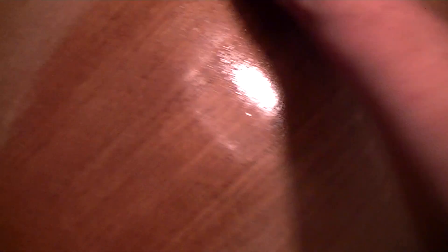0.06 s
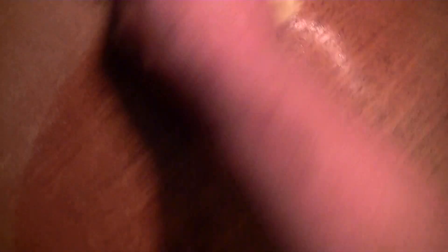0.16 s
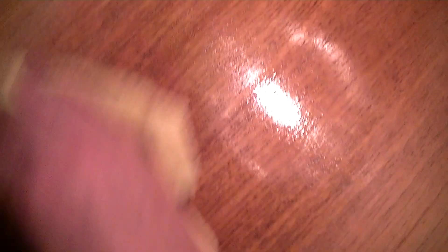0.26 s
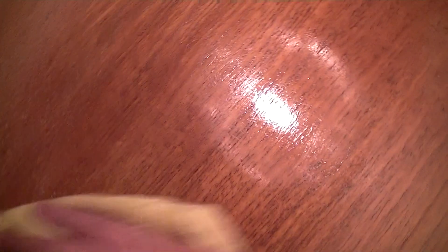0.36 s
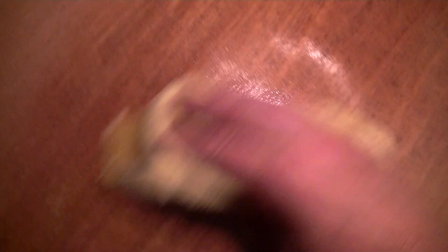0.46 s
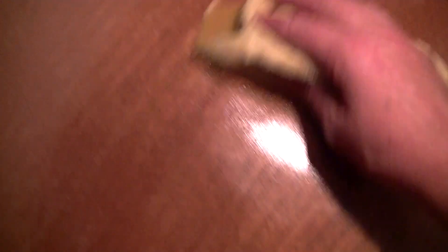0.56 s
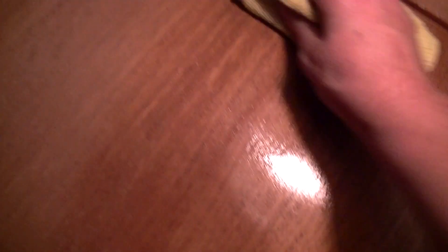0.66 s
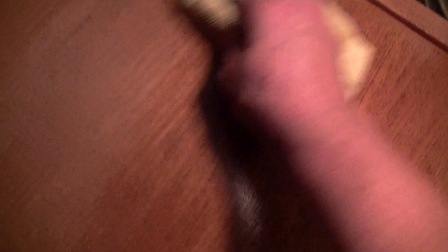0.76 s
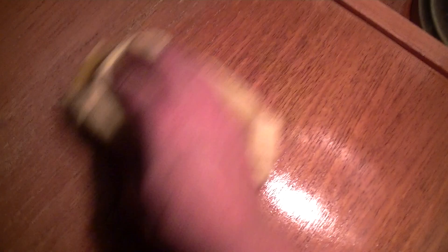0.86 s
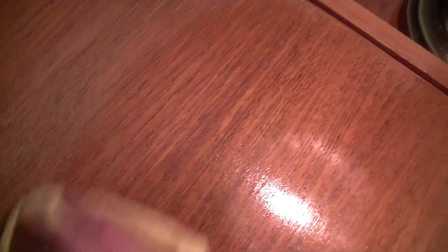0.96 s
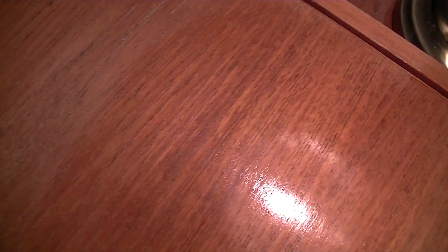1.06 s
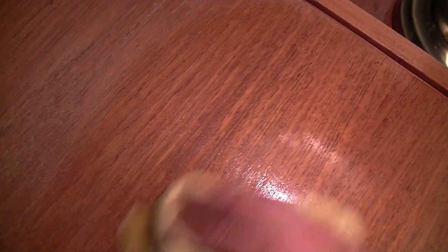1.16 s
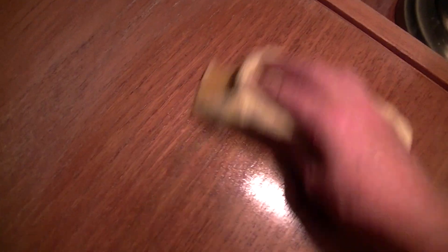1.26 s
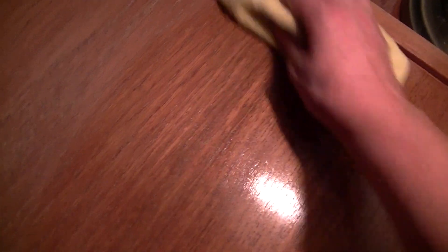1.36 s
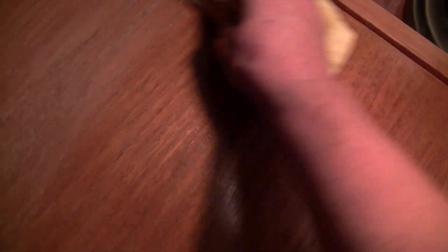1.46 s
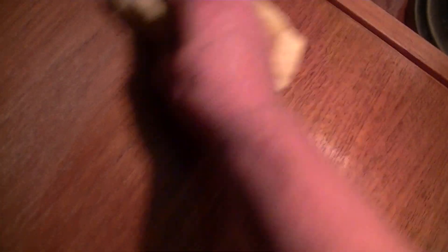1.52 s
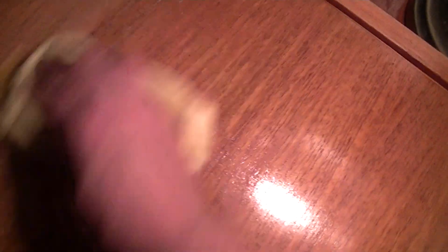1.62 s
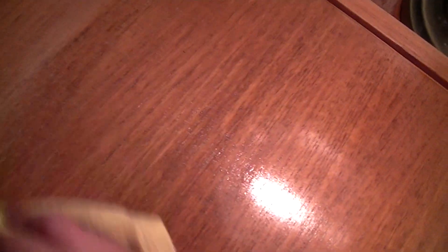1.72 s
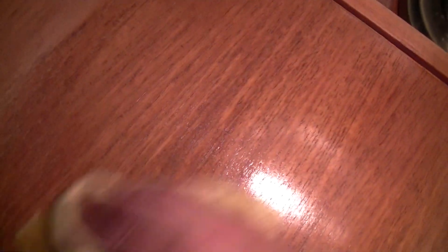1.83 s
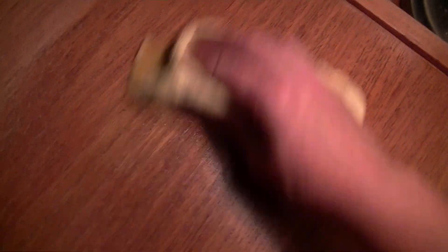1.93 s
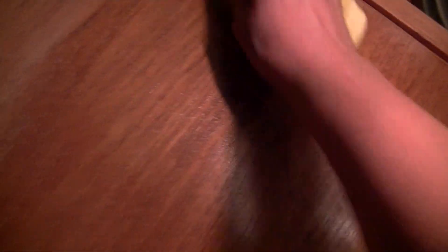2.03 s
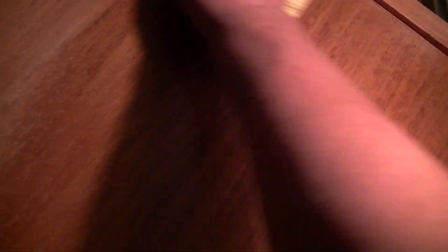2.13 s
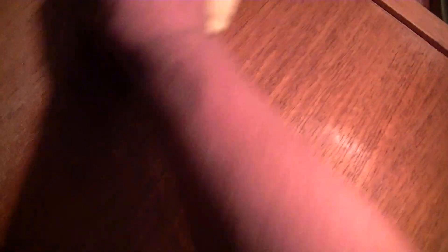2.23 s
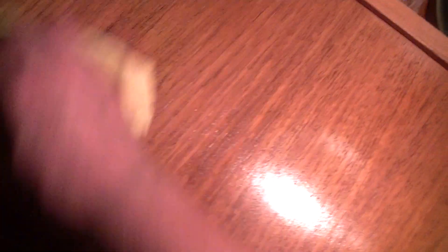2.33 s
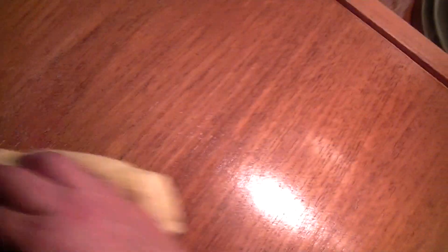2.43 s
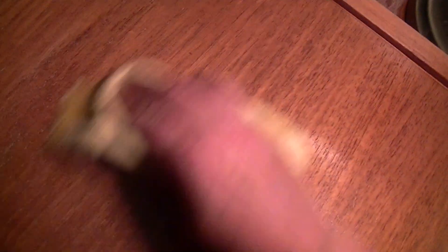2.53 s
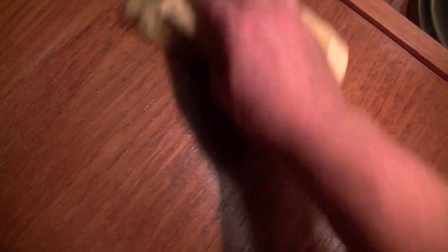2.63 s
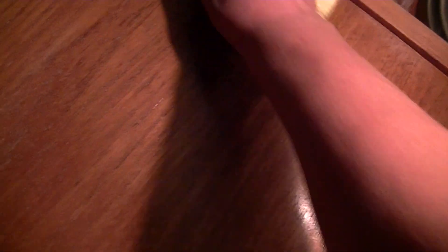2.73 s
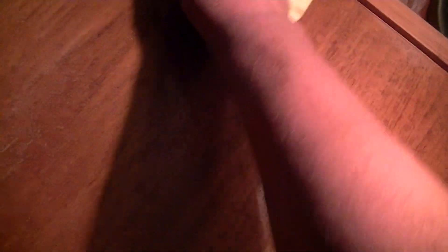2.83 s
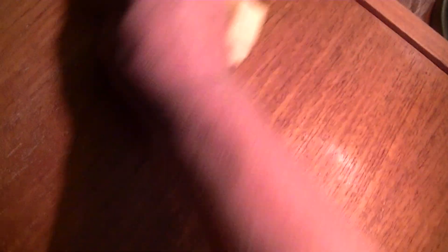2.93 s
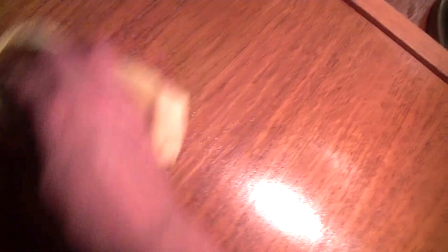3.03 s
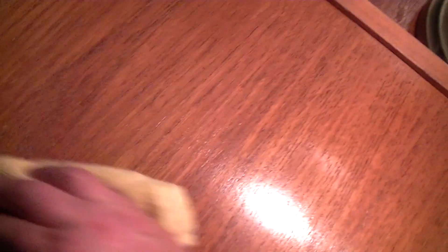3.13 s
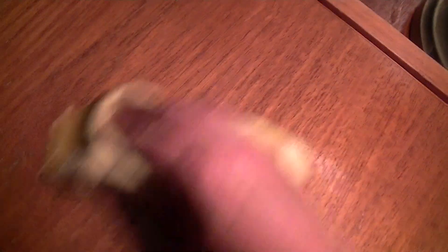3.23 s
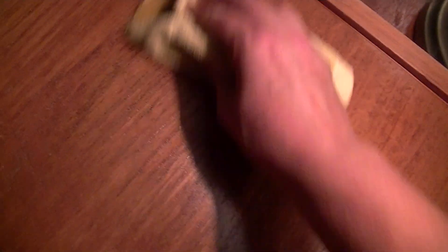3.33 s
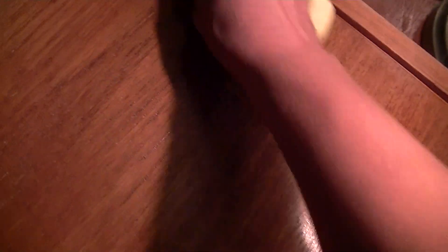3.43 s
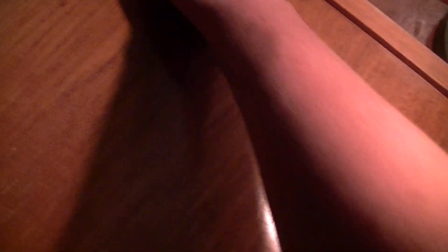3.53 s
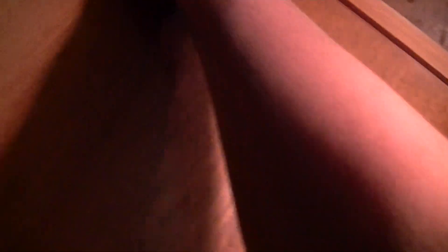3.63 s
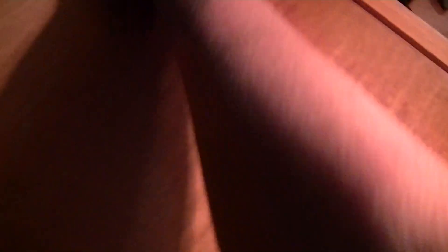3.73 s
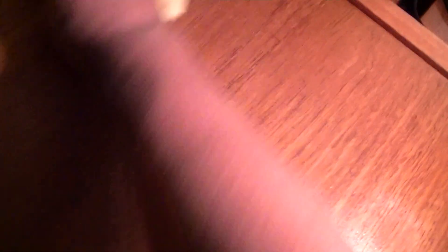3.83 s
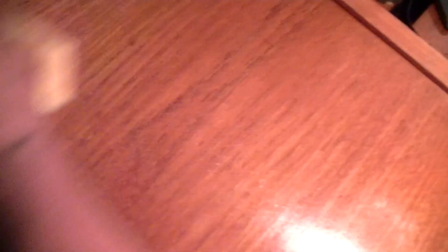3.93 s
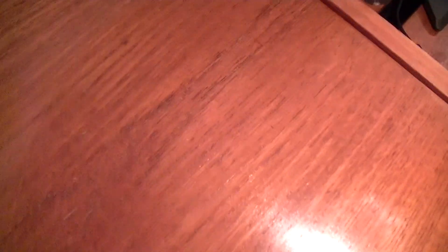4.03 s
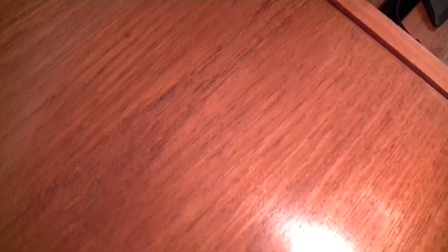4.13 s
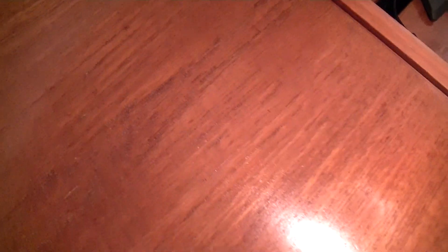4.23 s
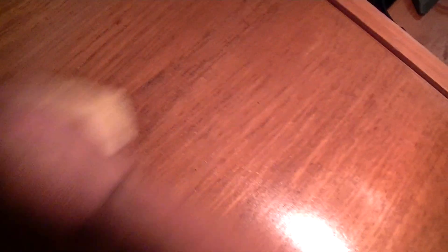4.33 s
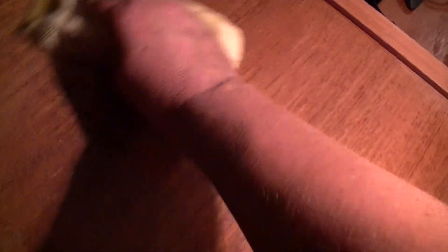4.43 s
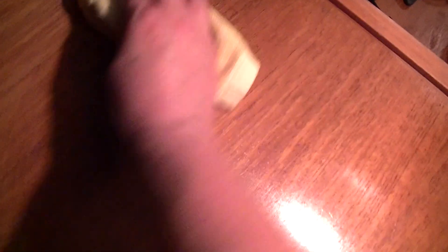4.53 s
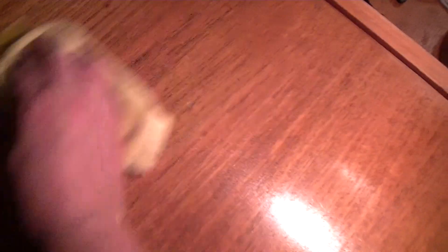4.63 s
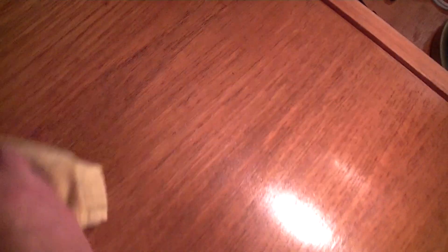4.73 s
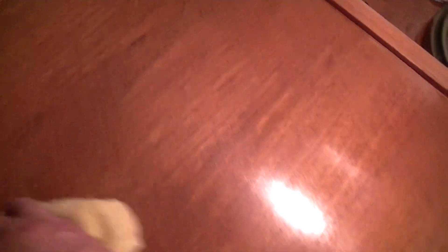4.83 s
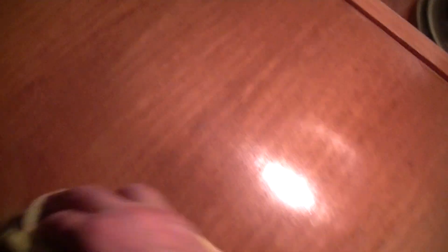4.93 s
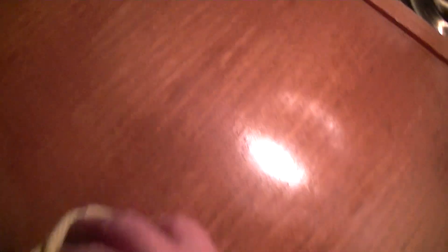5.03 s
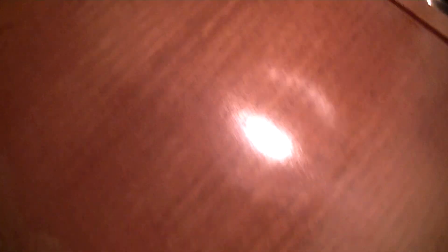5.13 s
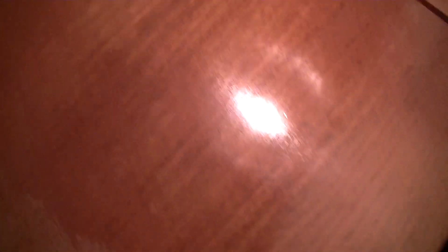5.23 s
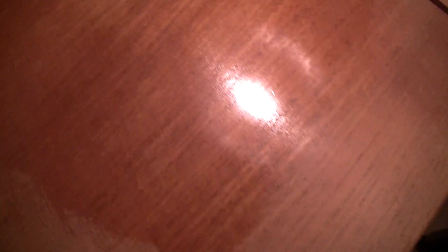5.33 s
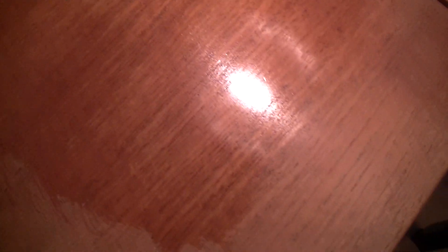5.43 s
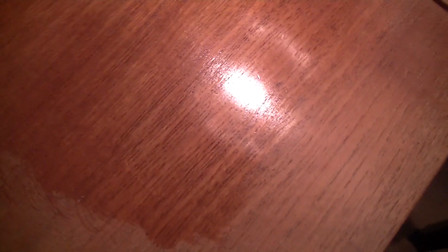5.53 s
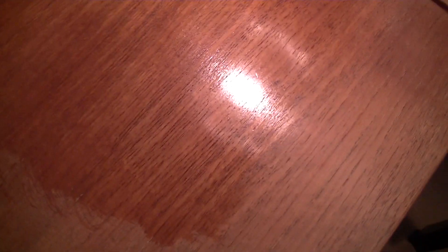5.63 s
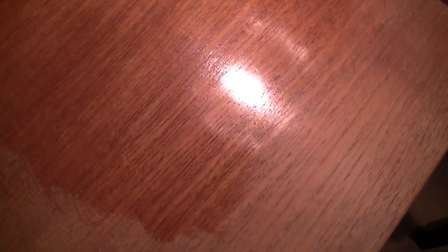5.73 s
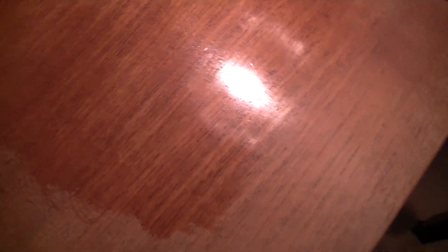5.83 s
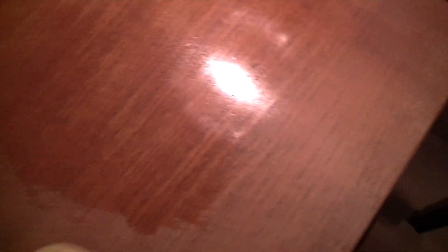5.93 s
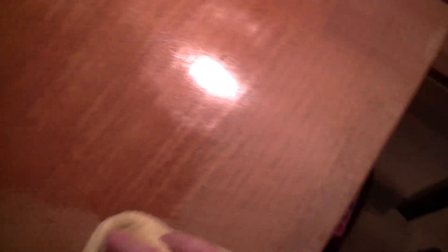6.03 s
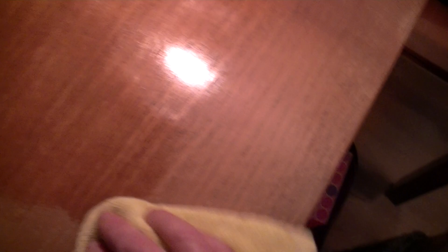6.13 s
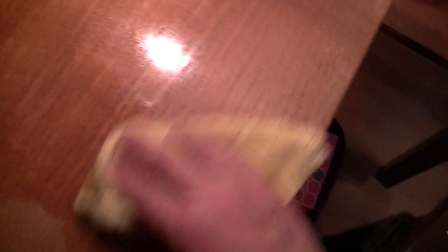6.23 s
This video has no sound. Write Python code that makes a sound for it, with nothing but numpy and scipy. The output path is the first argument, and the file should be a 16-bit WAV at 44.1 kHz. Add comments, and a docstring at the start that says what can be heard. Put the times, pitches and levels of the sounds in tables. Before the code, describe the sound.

A cloth rubs a wooden tabletop in quick looping strokes, a swishing hiss with soft bumps, then slows nearly to silence and restarts.

```python
"""In a quiet room, close by, an oily cloth is rubbed in loops over a wooden tabletop. Many tiny fibre slips
make a noisy hiss, shaped by the hand's speed and pressure. Short noise bursts are bumps and catches; they and
the rub ring the wood, and so do knuckle knocks. The hand slows almost to rest, then starts again: thin sticky
ticks are peeling cloth. A fan gives soft noise and steady tones; a small lens motor whines faintly and ticks as
runs of short pips."""
import sys
import numpy as np
from scipy import signal
from scipy.fft import rfft, irfft, next_fast_len
from scipy.io import wavfile

SR = 44100
rng = np.random.default_rng(int(sys.argv[2]) if len(sys.argv) > 2 else 0)


def store_pcm(level_fs):
    """Save levels as 16-bit WAV."""
    pcm = np.round(np.clip(level_fs, -1, 1) * 32767).astype(np.int16)
    wavfile.write(sys.argv[1], SR, np.atleast_2d(pcm).T)


N = 276286
TIME = np.arange(N) / SR  # seconds

# Fan air, balance of low and high: pitch_hz, relative_level_db
AIR_COLOUR = [(60, -47), (165, -26.5), (240, -15), (310, -8.5), (420, -3.5), (560, 1.5), (780, -2.5),
              (1050, -1), (1600, -7.5), (3500, -13), (4800, -11.5), (5400, -19.5), (9000, -25.5),
              (15500, -37)]
# Fan air, balance of the two sides: pitch_hz, left_minus_right_db
AIR_LEAN = [(1500, -.6), (2600, 0)]
# Fan air, arriving from all around: pitch_hz, side_noise_db (against the shared sound)
AIR_SCATTER = [(250, -10), (600, -12), (1500, -7), (3000, -5), (7000, -11), (12000, -22)]
# Steady tones of the fan and mains, and the lens motor's faint whine at 3273 Hz: pitch_hz, level_db (rms)
HUM_TONES = [(122, -101), (266, -84), (532.7, -78), (3273, -77.3), (8188, -93)]
# Low drone, which swells and fades: time_s, level_db (rms)
DRONE_LEVEL = [(0, -86), (1.0, -90.5), (1.6, -79), (2.3, -81.5), (3.2, -86), (4.5, -84.5), (5.2, -92),
               (6.26, -90)]
DRONE_HZ = 242.2
# Runs of the lens motor: start_s, end_s, level_db (peak)
MOTOR_RUNS = [(5.205, 5.35, -61.5), (5.44, 5.75, -61.3), (5.952, 6.03, -62)]
MOTOR_STEPS_PER_S = 30
# Middles of the overlapping bands that waver separately: pitch_hz
BAND_CENTRES_HZ = [250, 600, 1100, 2000, 3800, 6500, 9500, 13500]

# Ringing of the table: pitch_hz, width_hz, level_db
WOOD_MODES = [(129, 4.4, -17), (236, 15, 7.5), (269.4, 8.3, 7), (401, 41, 13), (520, 47, 7.5),
              (661, 32, 11.5), (910, 63, 4.5), (1097, 140, 9.5), (1255, 58, -4)]
# Knuckle knocks through the cloth: start_s (middle of the push), push_db, contact_s
KNOCKS = [(1.492, 2.5, .0015), (3.5180, -10, .00012), (3.5257, -8, .00008), (3.5380, -16, .0001)]
KNOCK_LOW_CUT_HZ = 230
# Hand bumps on the top: start_s, level_db (rms at the height), pitch_hz, width_hz
THUMPS = [(0.174, -60.5, 456, 310), (1.310, -69, 282, 100), (1.335, -60, 535, 210), (1.480, -78, 127, 13),
          (1.500, -61.5, 363, 95), (2.105, -61, 520, 270), (2.355, -68, 272, 72), (2.405, -64.5, 263, 70),
          (2.741, -49.5, 756, 150), (3.516, -44, 1000, 440), (3.518, -49.5, 480, 300),
          (3.523, -45, 1200, 490), (3.533, -52, 670, 280), (3.950, -62, 300, 110), (4.880, -67, 370, 140),
          (4.950, -67, 330, 115), (5.225, -63, 560, 180), (6.025, -63.5, 400, 150), (6.027, -58, 1030, 450)]
THUMP_CYCLES = 5.5  # time to swell, in cycles of the bump's pitch: low bumps are slower
# Cloth catching and letting go: start_s, level_db (rms at the height), pitch_hz, width_hz, swell_s
CATCHES = [(2.146, -48.5, 1800, 1200, .005), (2.745, -42.5, 2000, 2200, .003),
           (3.512, -48, 2600, 900, .002), (3.520, -46, 2050, 500, .003), (3.549, -46, 1500, 1200, .004),
           (3.554, -44, 2650, 800, .003), (3.564, -47, 1150, 700, .0015), (3.608, -42, 1880, 500, .004),
           (3.696, -43, 2800, 3000, .0006), (4.136, -48.5, 3000, 2500, .011),
           (4.138, -40.5, 2000, 700, .0042), (4.407, -44, 2500, 1800, .0014),
           (4.940, -56, 1700, 2000, .011), (4.996, -54, 2000, 2500, .0009)]
# Sticky cloth peeling off the finish: start_s, level_db (rms at the height), pitch_hz, swell_s
PEELS = [(5.790, -68, 8400, .0015), (6.113, -69, 12500, .004), (6.164, -63.5, 8500, .0035),
         (6.185, -52, 5300, .0018)]
PEEL_WIDTH = 0.35  # band width as a share of pitch_hz

# Steady travel of the hand: time_s, speed_db, extra_pressure_db, extra_sheen_db
GLIDE = [(0.0, -0.5, -1.5, -1.8), (0.39, -3.5, -1, -1), (1.09, -2.5, -5.5, -1.5), (2.2, -1.5, -1.6, 1),
         (3.2, 0, -2, -1.2), (3.58, -1.16, 3.5, 0.6), (4.26, -4.5, 0.6, -3.5), (4.79, -1, -4.5, 3.5),
         (4.91, -11, 4.5, 2.5), (5.19, -20, 0, 4), (5.74, -20.5, 1.5, 3.5), (6.08, -14, 7.5, -3.5),
         (6.14, -21, 8, 11), (6.18, -10.5, -3, 7.5), (6.26, -6, -13, -2)]
# Arm strokes on top of the travel: middle_s, length_s, speed_db, extra_sheen_db, extra_pressure_db
STROKES = [(0.096, 0.21, 1.5, -0.5, 0.5), (0.272, 0.24, 5, -4, 0), (0.626, 0.77, 1, 2.5, 3),
           (0.982, 0.23, 5.5, -3, 0.5), (1.308, 0.37, 1.5, 3, 3), (1.51, 0.3, 2.5, 0.3, 2),
           (1.694, 0.27, 5.5, -5, 0.5), (1.95, 0.31, 1.6, 0.5, 1.5), (2.148, 0.24, 2.5, -1, 3.5),
           (2.373, 0.18, 4, -3, 1.5), (2.64, 0.35, 2, 1, -0.5), (2.887, 0.17, 3, -1, -6),
           (3.066, 0.19, 3.5, -2, 1.5), (3.36, 0.34, -0.2, 3.5, -0.5), (3.8, 0.44, 2.6, 1, -4.5),
           (4.088, 0.59, 6, 2, 0), (4.306, 0.13, 3.5, 2, -1), (4.406, 0.35, 4.2, 2.5, -0.5),
           (4.628, 0.3, 2.5, -2.5, 7)]
UNSTEADY_DB = 0.31  # the hand never moves quite evenly
# dB of dull rub and of fine sheen for each dB of hand speed
PRESSED_FOLLOWS, SHEEN_FOLLOWS = 0.6, 1.37
# How much each part follows the pressure: pitch_hz, share
PRESSED_SHARE = [(800, 0.73), (2000, 0.33), (3800, 0.014)]
# How much each part follows the sheen: pitch_hz, share
SHEEN_SHARE = [(2000, 0.14), (3800, 0.16), (6500, 0.47), (9500, 1.04), (13500, 1.4)]
# Fibre slips each second, spread of their sizes in dB, share of smooth hiss
SLIPS_PER_S, SLIP_SPREAD_DB, SMOOTH_SHARE = 14000, 2.2, .9
# Cloth sliding on wood, balance of low and high: pitch_hz, relative_level_db
CLOTH_COLOUR = [(150, -38), (260, -23), (400, -18), (560, -11.5), (750, -2), (1300, -1), (2200, 1.5),
                (3700, -0.5), (4700, -1), (7000, -4), (9000, -8.5), (11200, -16), (12200, -19.5),
                (15500, -32)]
# Rub, balance of the two sides: pitch_hz, left_minus_right_db
RUB_LEAN = [(400, -.6), (1700, -.2), (2600, .2), (9500, 0)]
# Rub, close and direct: pitch_hz, side_noise_db (against the shared sound)
RUB_SCATTER = [(300, -15), (700, -19), (2000, -19.5), (4500, -20.5), (6800, -20.5), (9500, -25),
               (12500, -27)]
# Hollows of the top and under the hand: pitch_hz, width_hz, level_db (before they shift)
HOLLOWS = [(725, 53, -3.5), (933, 120, -10), (1350, 250, -9.5), (2020, 170, -13), (2640, 210, -22),
           (3220, 360, -19), (4580, 250, -15)]
# The weave bites and one pitch stands out: middle_s, length_s, gain, pitch_hz, width_hz
RASPS = [(0.027, 0.15, 0.63, 2200, 430), (0.215, 0.21, 0.94, 800, 150), (0.6, 0.57, .5, 530, 90),
         (0.752, 0.44, 0.37, 4300, 430), (1.678, .2, 0.45, 1300, 350), (2.21, 0.24, 1, 5960, 430),
         (2.39, 0.12, 0.5, 1350, 200), (3.684, 0.43, 0.44, 1850, 430), (3.85, 0.63, 0.64, 790, 130),
         (4.07, 0.58, 0.59, 2730, 430), (4.31, 0.18, 0.38, 2900, 430), (4.427, 0.16, 0.5, 2450, 430),
         (4.7, 0.37, 0.95, 3250, 600), (4.96, 0.26, 1, 2300, 430)]
# Very high, faint fizz that swells with some strokes: middle_s, length_s, level_db (rms at the height)
TOP_SWELLS = [(0.04, .28, -70), (0.63, .3, -69), (1.38, .35, -71), (2.0, .25, -72), (2.64, .24, -68),
              (3.38, .24, -69), (3.66, .35, -71), (4.24, .25, -78)]

# Loops out to the left and back: middle_s, length_s, reach (1 is a usual loop)
SWINGS = [(0.32, 0.36, 1), (0.95, .52, .95), (1.72, 0.43, 1), (2.4, 0.43, .95), (3.12, .5, .5),
          (4.1, 0.83, 1.6), (4.8, 0.51, 1.15)]
REST_REACH = 0.17  # always added: between loops the cloth is just left of centre
# Side balance at a total reach of 1: pitch_hz, left_minus_right_db
SWING_LEAN = [(1200, .05), (2000, .35), (2700, 1), (6500, 1.8), (10000, -1.8)]
# How far the left side is ahead at a total reach of 1: pitch_hz, lead_radians
SWING_LEAD = [(300, 0.04), (700, 0.078), (2500, 0.1), (5500, .02), (7500, -.02)]
TOP_CUT_HZ = 15720


def from_db(db):
    """Turn decibels into gain."""
    return 10 ** (np.asarray(db) / 20)


def rms_one(x):
    """Scale a sound to an average power of 1."""
    return x / np.sqrt(np.mean(x ** 2) + 1e-20)


def at_hz(points, hz):
    """Read a table between its points, with pitch on a log scale."""
    known_hz, values = np.transpose(points)
    return np.interp(np.log(hz), np.log(known_hz), values)


def drift(rate):
    """Wander slowly by chance, with spread 1, changing about `rate` times a second."""
    r = np.exp(-80 * np.pi * rate / SR)  # one slow point for every 40 samples
    noise = rng.standard_normal(N // 40 + 2002)
    slow = signal.lfilter([1], [1, -2 * r, r * r], noise)[2000:]  # skip the filter's start
    return np.interp(np.arange(N) / 40, np.arange(len(slow)), rms_one(slow))


def swell_at(middle, length):
    """Rise smoothly from 0 to 1 and fall back."""
    return np.cos(np.pi * np.clip((TIME - middle) / length, -.5, .5)) ** 2


def band(x, low_hz, high_hz):
    """Keep mainly the sound between two pitches."""
    edges = [low_hz, min(high_hz, .45 * SR)]
    return signal.sosfilt(signal.butter(2, edges, "band", fs=SR, output="sos"), x + 1e-18)


def resonate(x, modes):
    """Let a sound excite several ringing pitches side by side; a narrow width rings longer."""
    out = 0
    for hz, width, level_db in modes:
        r = np.exp(-np.pi * width / SR)
        gain = from_db(level_db) * (1 - r * r) / 2
        ring = [1, -2 * r * np.cos(2 * np.pi * hz / SR), r * r]
        out = out + gain * signal.lfilter([1, 0, -1], ring, x + 1e-18)
    return out


def tone(hz, level_db):
    """Make a nearly steady sine whose level and phase wander a little."""
    gain = np.sqrt(2) * from_db(level_db + 1.5 * drift(.5))
    return gain * np.sin(2 * np.pi * hz * TIME + .5 * drift(1))


def in_stereo(drive, colour, scatter, lean):
    """Colour one sound for two close microphones, adding opposite noise to the sides; power 1."""
    hz = np.maximum(np.fft.rfftfreq(N, 1 / SR), 1)
    sides = np.array([[1], [-1]])
    side_noise = from_db(at_hz(scatter, hz)) * rfft(rng.standard_normal(N))
    both = rfft(drive) + side_noise * sides
    gain = from_db(at_hz(colour, hz) + sides * at_hz(lean, hz) / 2)
    return rms_one(irfft(both * gain, N))


def zones(x):
    """Split a sound into overlapping bands that add up to the whole."""
    size = next_fast_len(N)
    hz = np.maximum(np.fft.rfftfreq(size, 1 / SR), 1)
    whole = rfft(x, size)
    pairs = []
    for centre, row in zip(BAND_CENTRES_HZ, np.eye(len(BAND_CENTRES_HZ))):
        share = np.interp(np.log(hz), np.log(BAND_CENTRES_HZ), row)
        pairs.append((centre, irfft(whole * share, size)[:, :N]))
    return pairs


def delayed(x, delay_s):
    """Make every channel arrive later."""
    return np.array([np.interp(TIME - delay_s, TIME, channel, left=0) for channel in x])


def bursts(rows):
    """Make soft contacts: each is a short flurry of noise in its own band that swells and dies."""
    out = np.zeros(2 * N)
    for s, level_db, hz, width, swell in rows:
        age = np.arange(int(10 * swell * SR)) / (swell * SR)
        shape = age * np.exp(1 - age)  # reaches 1 after the swell time
        low_hz = np.hypot(hz, width / 2) - width / 2
        noise = rng.standard_normal(len(age) + SR // 10)  # the extra lets the filter settle
        flurry = band(noise, low_hz, low_hz + width)[-len(age):] * shape
        start = int(s * SR)
        gain = from_db(level_db) * np.sqrt(np.mean(shape ** 2))
        out[start:start + len(age)] += gain * rms_one(flurry)
    return out[:N]


def room_air(air_db, waver_db):
    """The fan's slightly uneven rush is coloured noise, joined by steady tones and a drone."""
    rush = in_stereo(rng.standard_normal(N), AIR_COLOUR, AIR_SCATTER, AIR_LEAN)
    rush = sum(sound * from_db(waver_db * drift(9)) for _, sound in zones(rush))
    drone = tone(DRONE_HZ, np.interp(TIME, *np.transpose(DRONE_LEVEL)))
    hum = sum(tone(hz, level_db) for hz, level_db in HUM_TONES)
    return from_db(air_db) * rush + drone + hum


def focus_motor(whine_hz, step_s):
    """Each step of the lens motor is a brief, smooth pip of its housing."""
    out = np.zeros(N)
    for start, end, level_db in MOTOR_RUNS:
        for s in np.arange(start, end, 1 / MOTOR_STEPS_PER_S):
            near = slice(int(s * SR) - SR // 50, int(s * SR) + SR // 50)
            age = TIME[near] - s
            gain = from_db(level_db + rng.normal(0, .5))  # steps differ a little
            out[near] += gain * np.exp(-(age / step_s) ** 2) * np.sin(2 * np.pi * whine_hz * age)
    return out


def knocks():
    """A knuckle lands and bounces: rounded pushes with little bass set the wood ringing."""
    push = 0
    for s, push_db, contact_s in KNOCKS:
        pulse = np.exp(-.5 * np.minimum(((TIME - s) / contact_s) ** 2, 100))
        push = push + from_db(push_db) * pulse / pulse.sum()
    low_cut = signal.butter(2, KNOCK_LOW_CUT_HZ, "high", fs=SR, output="sos")
    push = signal.sosfilt(low_cut, push + 1e-18)
    # neighbouring modes move in opposite directions
    return sum((-1) ** k * resonate(push, [mode]) for k, mode in enumerate(WOOD_MODES))


def scuffs():
    """Dull, padded bumps of the hand and short, brighter catches of the cloth are noise bursts."""
    thumps = [(s, db, hz, width, THUMP_CYCLES / hz) for s, db, hz, width in THUMPS]
    return bursts(thumps + CATCHES)


def peels():
    """The cloth pulls free as it starts to move again, in thin, sticky ticks."""
    return bursts([(s, db, hz, PEEL_WIDTH * hz, swell) for s, db, hz, swell in PEELS])


def fibre_slips(per_s, spread_db, smooth_share):
    """Many tiny slips of uneven size, plus a share of smooth noise, merge into a hiss; power 1."""
    sizes = from_db(spread_db * np.minimum(rng.exponential(1, N), 6))
    signed = sizes * rng.choice([-1, 1], N)
    slips = rms_one(signed * (rng.random(N) < per_s / SR))
    return rms_one(slips + smooth_share * rng.standard_normal(N))


def oil_crackle(per_s, spread_db):
    """Threads of oil snap behind the cloth: a fine, very high crackle; power 1."""
    return rms_one(band(fibre_slips(per_s, spread_db, 0), 8000, 12300))


def top_fizz(low_hz, high_hz):
    """Tiny slips in a very high band make a faint fizz that swells with some strokes."""
    fizz = rms_one(band(fibre_slips(SLIPS_PER_S, SLIP_SPREAD_DB, 0), low_hz, high_hz))
    return fizz * sum(from_db(db) * swell_at(middle, length) for middle, length, db in TOP_SWELLS)


def hand_motion():
    """Give speed, pressure and sheen in dB: each stroke is a smooth swell on the steady travel."""
    s, *columns = np.transpose(GLIDE)
    speed, pressure, sheen = [np.interp(TIME, s, column) for column in columns]
    speed = speed + UNSTEADY_DB * drift(6.4)
    for middle, length, speed_db, sheen_db, pressure_db in STROKES:
        swell = swell_at(middle, length)
        speed = speed + speed_db * swell
        pressure = pressure + pressure_db * swell
        sheen = sheen + sheen_db * swell
    return speed, pressure, sheen


def shifting_folds(x, swell_db):
    """Folds open and close under the fingers, so each hollow speaks louder or softer in turn."""
    return x + sum(resonate(x, [hollow]) * from_db(swell_db * np.tanh(drift(1.94)))
                   for hollow in HOLLOWS)


def rubbing(hiss_db, pressed_db, sheen_db, crackle_db, judder_db, patchy_db, grip_db):
    """Pressure feeds the low rub and speed the sheen; grip wavers and the weave judders on the grain."""
    speed, pressure, extra_sheen = hand_motion()
    pressed = PRESSED_FOLLOWS * speed + pressure + grip_db * drift(2.1)
    sheen = SHEEN_FOLLOWS * speed + extra_sheen
    slips = fibre_slips(SLIPS_PER_S, SLIP_SPREAD_DB, SMOOTH_SHARE)
    friction = in_stereo(slips, CLOTH_COLOUR, RUB_SCATTER, RUB_LEAN)
    judder = judder_db * drift(45)
    out = 0
    for hz, sound in zones(friction):
        low, high = at_hz(PRESSED_SHARE, hz), at_hz(SHEEN_SHARE, hz)
        level_db = low * (pressed + pressed_db) + high * (sheen + sheen_db)
        level_db = level_db + (1 - low - high) * (speed + hiss_db)
        out = out + sound * from_db(level_db + judder + patchy_db * drift(7.3))
    crackle = from_db(sheen + crackle_db) * oil_crackle(per_s=3200, spread_db=2.5)
    return shifting_folds(out, swell_db=5.5) + crackle


def rasping(rub):
    """Where the weave bites, one resonance swells up out of the rub and fades again."""
    return rub + sum(gain * swell_at(middle, length) * resonate(rub, [(hz, width, 0)])
                     for middle, length, gain, hz, width in RASPS)


def near_echoes(x, echo_db, wander_s):
    """Add short echoes from nearby surfaces, whose delays wander slowly by chance."""
    echoes = sum(delayed(x, delay_s + wander_s * drift(0.98)) for delay_s in (.0014, .0061, .0113))
    return x + from_db(echo_db) * echoes


def swinging(x, wall_db, wall_s, wall_lag_s):
    """Out to the left the side balance and timing change, and a wall throws the sound back."""
    reach = REST_REACH + sum(far * swell_at(middle, length) for middle, length, far in SWINGS)
    size = next_fast_len(N)
    hz = np.maximum(np.fft.rfftfreq(size, 1 / SR), 1)
    left_over_right = from_db(at_hz(SWING_LEAN, hz)) * np.exp(1j * at_hz(SWING_LEAD, hz))
    # half of the difference goes to each side
    side_change = left_over_right ** np.array([[.5], [-.5]])
    far_left = irfft(rfft(x, size) * side_change, size)[:, :N]
    wall = np.vstack([delayed(x[:1], wall_s), delayed(x[1:], wall_s + wall_lag_s)])
    return x + reach * (far_left - x + from_db(wall_db) * wall)


def scene():
    """Place the cloth and table in front and the room behind."""
    room = room_air(air_db=-59.6, waver_db=0.9)
    motor = focus_motor(whine_hz=3880, step_s=0.0036)
    bumps = scuffs()
    rub = rasping(rubbing(hiss_db=-46.5, pressed_db=-46.0, sheen_db=-46.5, crackle_db=-66.3,
                          judder_db=0.4, patchy_db=0.74, grip_db=1.0))
    table = resonate(from_db(-13.5) * bumps + from_db(-18.5) * rub, WOOD_MODES) + knocks()
    hand = rub + bumps + table + peels() + top_fizz(low_hz=11300, high_hz=14300)
    hand = near_echoes(hand, echo_db=-18.0, wander_s=0.000206)
    hand = swinging(hand, wall_db=-32.5, wall_s=0.0043, wall_lag_s=0.0001)
    return hand + motor + room


def record(dry, low_cut_hz=125, self_noise_db=-94):
    """Small microphones lose the bass and add a faint rumble each; the top is cut steeply."""
    low_cut = signal.butter(4, low_cut_hz, "high", fs=SR, output="sos")
    thin = signal.sosfilt(low_cut, dry)
    rumble = from_db(self_noise_db) * rms_one(band(rng.standard_normal((2, N)), 15, 170))
    top_cut = signal.ellip(12, .1, 70, TOP_CUT_HZ, fs=SR, output="sos")
    return signal.sosfilt(top_cut, thin + rumble)


dry = scene()
out = record(dry)
store_pcm(out)
```